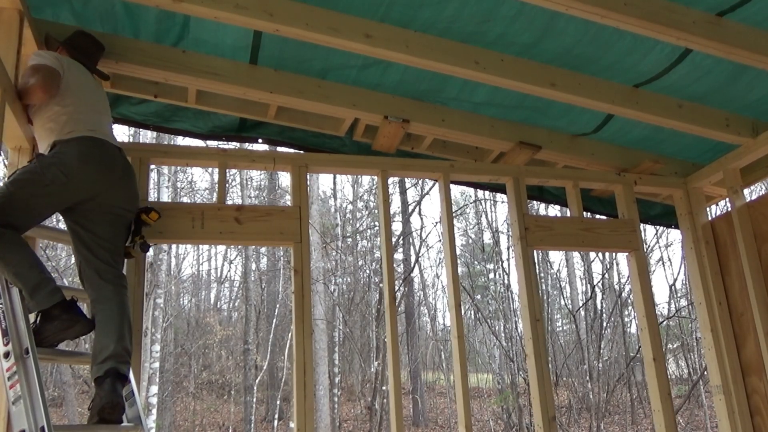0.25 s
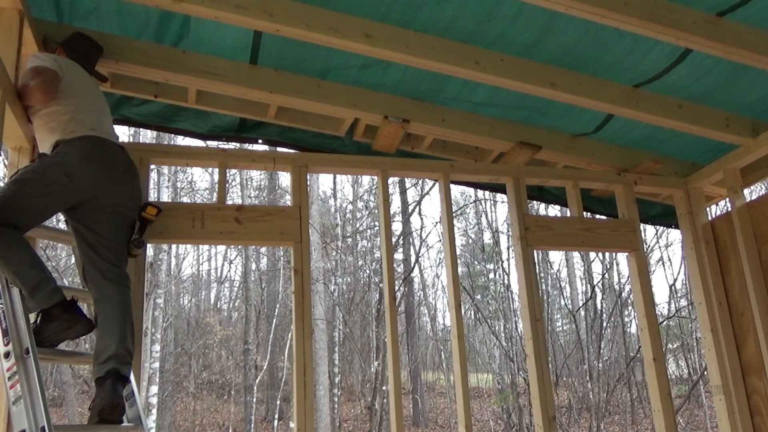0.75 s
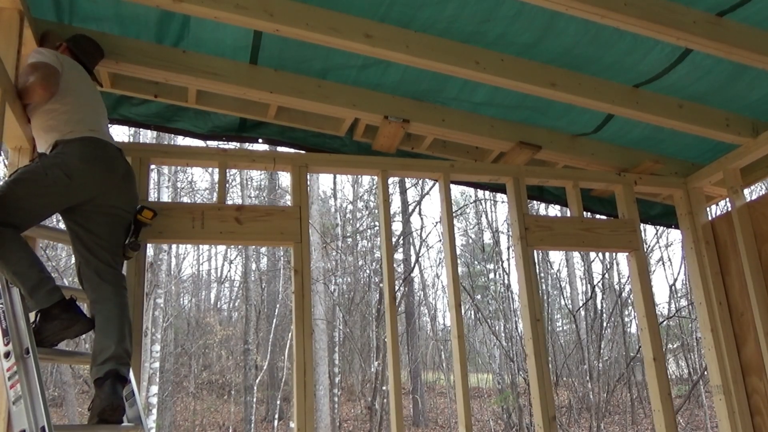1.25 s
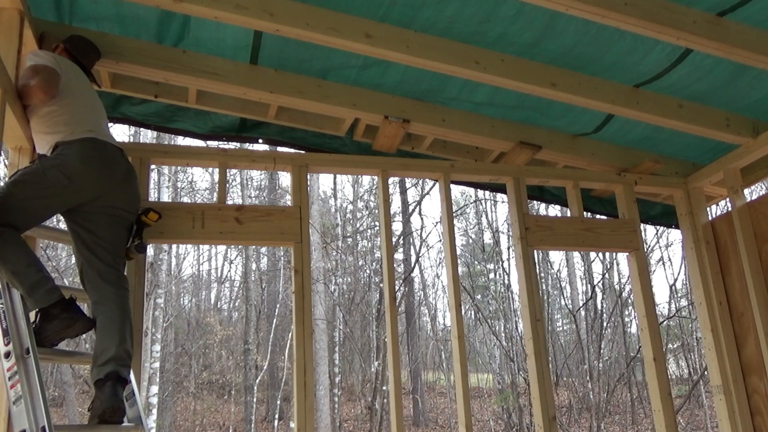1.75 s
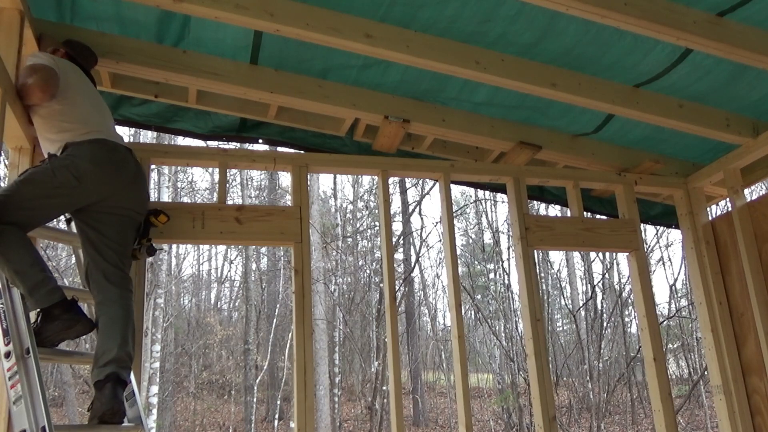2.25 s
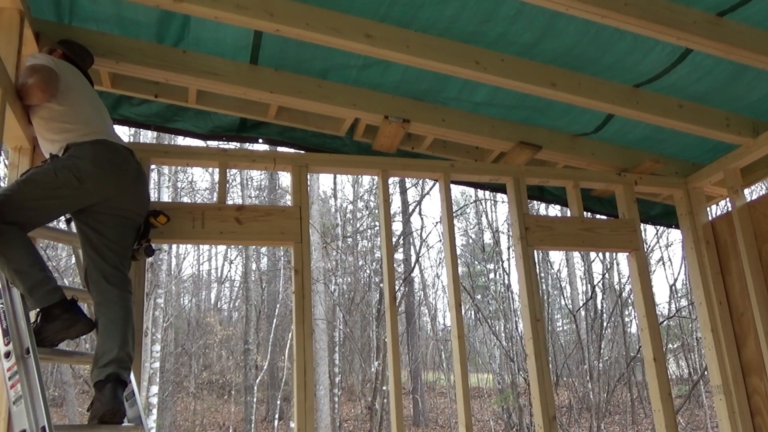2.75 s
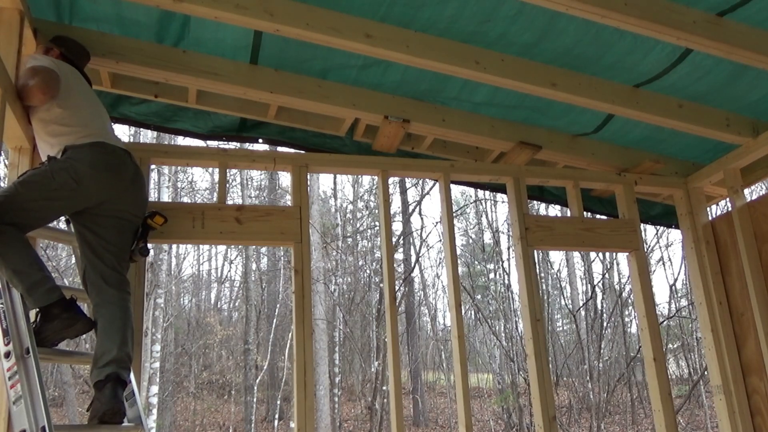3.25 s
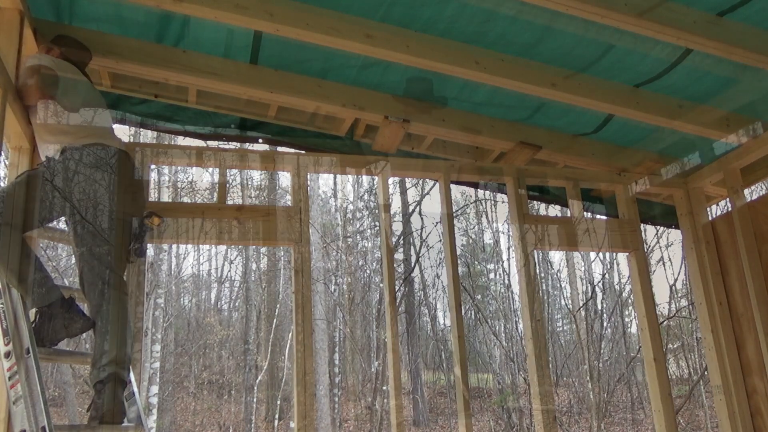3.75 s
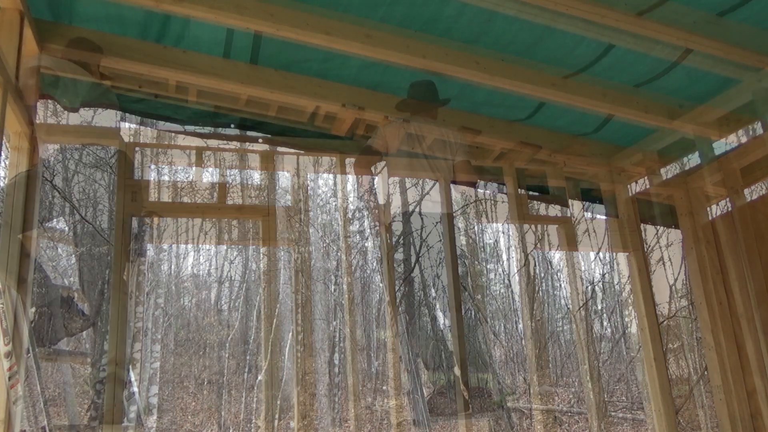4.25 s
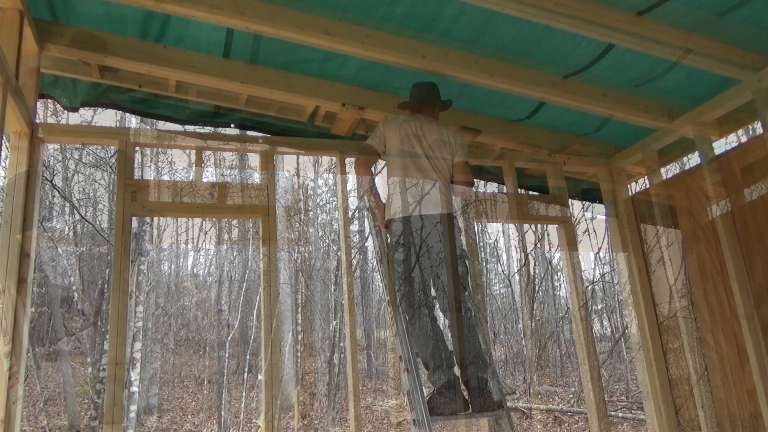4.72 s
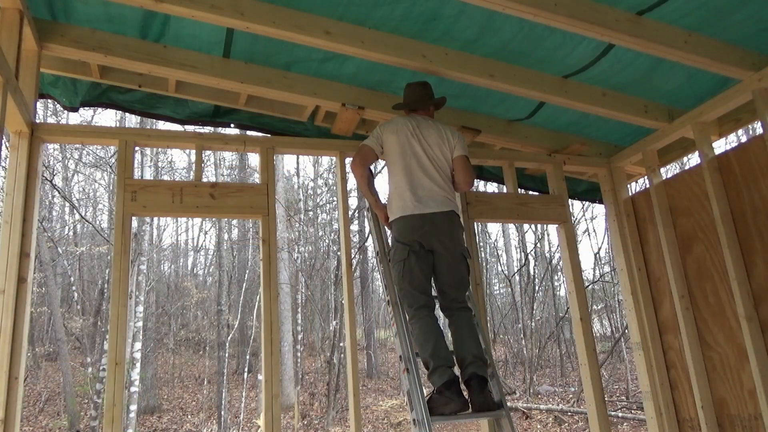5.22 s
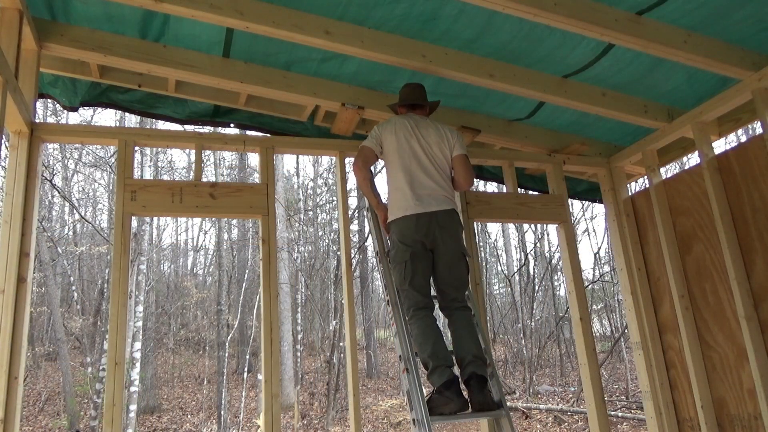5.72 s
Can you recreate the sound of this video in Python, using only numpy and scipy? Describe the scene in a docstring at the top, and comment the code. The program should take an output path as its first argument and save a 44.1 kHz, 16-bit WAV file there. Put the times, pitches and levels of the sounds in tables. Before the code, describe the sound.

Under a tarp roof in the woods, soft continuous rain makes a dense bed of tiny taps. Over it come abrupt bursts of wet sheet rustling, bright and crackling with low flaps, spaced about a second apart and fading in strength. Sharp little drips tick at random. The second half is calmer, lighter rain with a single brief distant chirp. Heard in modest stereo from below, with slight reverberation off the framing.

```python
"""Under open roof framing with a tarp stretched over it: steady rain patters on the sheet, as filtered
random grains and clicks, and sinks to a quieter level in the second half. Five times the wet sheet is
tugged and rustles in a short burst of coarse grains, noise snaps and low slaps. Single large drips tick
on it as short noise splashes, and a far bird, a gliding near sine, gives one thin high call. All but
the rain echoes in the framing; two microphone ports hear it in stereo."""
import sys
import numpy as np
from scipy import signal
from scipy.io import wavfile

SR = 44100
rng = np.random.default_rng(int(sys.argv[2]) if len(sys.argv) > 2 else 0)


def wav_record(signal):
    """Record a signal, one row per channel, as 16-bit PCM in the file named by sys.argv[1]."""
    frames = np.transpose(np.atleast_2d(signal))
    bounded = np.clip(frames, -1, 1)
    # unit amplitude maps onto the largest positive 16-bit level
    quanta = np.round(bounded * 32767).astype(np.int16)
    wavfile.write(sys.argv[1], SR, quanta)


N = 263718


def gain_of(db):
    """Amplitude factor of a level in dB."""
    return 10 ** (np.asarray(db) / 20)


def evened(x):
    """Scaled to an RMS of one."""
    return x / np.sqrt(np.mean(x ** 2) + 1e-20)


def read(points, hz):
    """Curve value at a frequency, interpolated along log frequency."""
    f, value = np.transpose(points)
    return np.interp(np.log(hz + 1), np.log(f + 1), value)


def add(mix, s, sound):
    """Lay a stereo sound into the mix at a time in seconds."""
    part = mix[:, round(s * SR):][:, :sound.shape[1]]
    part += sound[:, :part.shape[1]]


def coloured(x, points):
    """Causal minimum-phase filter with the given spectrum."""
    gain_db = read(points, abs(np.fft.fftfreq(8192, 1 / SR)))
    log_gain = np.log(gain_of(np.maximum(gain_db, -100)))
    spectrum = np.exp(np.conj(signal.hilbert(log_gain)))
    taps = np.fft.ifft(spectrum).real[:4096]
    return signal.oaconvolve(x, taps[None], axes=1)[:, :x.shape[1]]


# How wide the two microphone ports hear a sound: (frequency [Hz], side over mid [dB])
STEREO_WIDTH = [(60, -34), (130, -38), (230, -20.5), (400, -20.5), (800, -14), (1600, -10), (4000, -9.5),
                (8500, -9), (10000, -18.5), (11200, -42), (13000, -41)]


def stereo(pair, pan_db=0):
    """One row is heard by both microphone ports alike, the other as their difference; bass does not lean."""
    lean = np.tanh(pan_db * np.log(10) / 40) * pair[0]  # pan_db is left over right
    lean = signal.lfilter(*signal.butter(2, [500, 11000], "band", fs=SR), lean)
    side = coloured(pair[1:], STEREO_WIDTH)[0] + lean
    return np.array([pair[0] + side, pair[0] - side])


def random_sizes(shape, spread_db):
    """Random signs and exponentially spread sizes; a negative spread makes a few small instead of large."""
    size = gain_of(spread_db * np.minimum(rng.exponential(1, shape), 5))
    return size * rng.choice([-1., 1.], shape)


def grains(tilt_db, flap_db, per_cycle, spread_db, cycles):
    """Two rows of short random rings in a ladder of pitches; the high, short ones come more often."""
    out = np.zeros((2, len(tilt_db)))
    for hz in np.geomspace(30, 17000, 20):
        t = np.arange(0, 3 * cycles / hz, 1 / SR)
        ring = np.sin(2 * np.pi * hz * t) * t * np.exp(-2 * np.pi * t * hz / cycles)
        ring = ring[None] / np.linalg.norm(ring)
        hit = rng.random(out.shape) < min(per_cycle * hz / SR, 1)
        hits = evened(hit * random_sizes(out.shape, spread_db))
        weight = gain_of(tilt_db * np.log2(hz / 2500) + flap_db / (1 + (hz / 600) ** 4))
        rings = signal.oaconvolve(hits * weight, ring, axes=1)[:, :out.shape[1]]
        out += np.sqrt(hz / 5000) * rings  # equal power per Hz before the weight
    return out


def crackle(length, per_s, spread_db):
    """Two rows of bare one-sample clicks at random times and sizes."""
    hit = rng.random((2, length)) < per_s / SR
    return evened(hit * random_sizes(hit.shape, spread_db))


def drift(per_s):
    """Slow chance up to the given rate: sines of random phase, the slower ones stronger."""
    t = np.arange(N) / SR
    rates = np.geomspace(per_s / 10, per_s, 16)
    return evened(sum(np.sin(2 * np.pi * (f * t + rng.random())) / np.sqrt(f) for f in rates))


# Rain on the sheet, sinking halfway: (time [s], level [dB])
RAIN_LEVEL = [(0.0, -41.5), (0.4, -39.5), (0.8, -38), (1.06, -40.5), (2.05, -39), (2.5, -41), (3.05, -40),
              (3.46, -40.5), (4.01, -45.5), (4.78, -48), (5.61, -46.5), (5.98, -47.5)]
# Colour of the patter: (frequency [Hz], filter gain [dB])
PATTER_COLOUR = [(13, -73), (22, -50), (53, -44), (87, -20.5), (165, -20.5), (211, -14), (398, -7),
                 (482, -2), (1580, 0), (3230, -4), (7190, -11), (8970, -10), (14700, -28), (16000, -38)]
# Brightness at the loudest [dB per octave], and its change per dB of level: lighter rain is brighter
RAIN_TILT_DB, RAIN_TILT_PER_DB = .55, -.07
RAIN_PAN_DB = -1.25  # left over right


def rain():
    """Countless small drops ring on the sheet, the nearest as dry clicks; the level wavers a little."""
    t = np.arange(N) / SR
    level_db = np.interp(t, *np.transpose(RAIN_LEVEL))
    tilt_db = RAIN_TILT_DB + RAIN_TILT_PER_DB * (level_db - level_db.max())
    drops = evened(grains(tilt_db, 0, per_cycle=.45, spread_db=1.5, cycles=1.79))
    drops = drops + gain_of(-7) * crackle(N, per_s=3000., spread_db=1.0)
    level = gain_of(level_db + 0.56 * drift(25))
    return stereo(evened(coloured(drops, PATTER_COLOUR)) * level, RAIN_PAN_DB)


# Tugs of the sheet: (start [s], hardest pull [s], end [s], top level [dB], low flap [s])
SHEET_TUGS = [(.615, 0.686, 0.83, -20.5, 0.662), (1.639, 1.726, 1.83, -24.5, 1.745),
              (2.795, 2.879, 3.0, -24, 2.905), (3.38, 3.429, 3.52, -29, 3.44),
              (4.35, 4.404, 4.46, -33, 4.42)]
# Colour of the rustle: (frequency [Hz], filter gain [dB])
RUSTLE_COLOUR = [(15, -62), (25, -24), (130, -24.5), (200, -12), (394, -8.5), (476, -6.5), (591, -8.5),
                 (1840, -11.5), (2160, -12.5), (3080, -12.5), (9320, -19), (13200, -34.5), (16000, -71)]
# The crease runs across the roof: (share of the tug [0-1], left over right [dB])
CREASE_PAN = [(0, 2.5), (.5, 0.5), (1, -2)]
# Level at start and end against the top [dB], and the bend of each slope
RISE_DB, RISE_CURVE, FALL_DB, FALL_CURVE = -26, 2.28, -27.5, 1.57
# A harder pull is brighter: dB per octave at the top, and its change per dB of level
TILT_TOP_DB, TILT_PER_DB = 1.34, 0.2329
# Weight of the bass, below about 600 Hz: held back at rest, swelling round the flap for a spread in seconds
FLAP_REST_DB, FLAP_TOP_DB, FLAP_S = -12.5, -1, 0.027


def tug(start, top, end, top_db, flap):
    """Creases snap and water jumps off the sheet: coarse grains and clicks under the pull."""
    t = np.arange(start, end, 1 / SR)
    before = np.maximum(top - t, 0) / (top - start)
    after = np.maximum(t - top, 0) / (end - top)
    pull_db = RISE_DB * before ** RISE_CURVE + FALL_DB * after ** FALL_CURVE
    tilt_db = TILT_TOP_DB + TILT_PER_DB * pull_db
    flap_db = FLAP_REST_DB + (FLAP_TOP_DB - FLAP_REST_DB) * np.exp(-((t - flap) / FLAP_S) ** 2)
    creases = grains(tilt_db, flap_db, per_cycle=.25, spread_db=1.0, cycles=2.39)
    clicks = gain_of(-11.5 + tilt_db) * crackle(len(t), per_s=1400.0, spread_db=-1.5)
    rustle = evened(coloured(creases + clicks, RUSTLE_COLOUR))
    pan_db = np.interp(np.linspace(0, 1, len(t)), *np.transpose(CREASE_PAN))
    level = gain_of(top_db + pull_db) * signal.windows.tukey(len(t), .08)
    return start, stereo(rustle * level, pan_db)


def tick(s, strength_db, hz, t60, pan_db, rise, crack):
    """Noise in a band round the pitch: a crack and a splash that dies quickly."""
    t = np.arange(5000) / SR
    band = signal.butter(2, [hz / 1.71, min(hz * 1.34, .45 * SR)], "band", fs=SR)
    fade = crack * np.exp(-t / 0.00099) + gain_of(-60 * t / t60)
    splash = rng.standard_normal((2, len(t))) * fade * (1 - np.exp(-t / rise))
    splash = signal.lfilter(*band, splash)
    # the microphone softens the very top of each tick
    splash = signal.lfilter(*signal.butter(2, 14500, fs=SR), splash)
    return s, stereo(gain_of(strength_db) * np.sqrt(6000 / hz) * splash, pan_db)


# Big creases that snap during a tug: (time [s], strength before the pitch weighting [dB], pitch [Hz])
CREASE_SNAPS = [(0.631, -22, 4500), (0.645, -17, 3080), (0.664, -10, 4200), (0.683, -12, 3800),
                (0.692, -15.5, 1300), (0.703, -12, 1730), (0.729, -14, 2780), (0.753, -16, 2500),
                (0.768, -31, 2900), (1.672, -19.5, 1440), (1.707, -28, 3200), (1.729, -19, 1000),
                (2.834, -21, 1690), (2.852, -24, 3110), (2.889, -22, 950), (3.387, -25, 1310),
                (3.413, -22, 1600), (3.426, -23, 4500), (4.365, -33, 1950), (4.386, -27, 1180)]


def snap(s, strength_db, hz):
    """A crease snaps: a softer-edged tick with little crack."""
    return tick(s, strength_db, hz, t60=0.061, pan_db=1, rise=0.0016, crack=.2)


# The slack sheet slaps the rafters: (time [s], strength before the soft start [dB], pitch [Hz])
RAFTER_SLAPS = [(0.659, -22, 460), (0.719, -19, 496), (1.734, -18.5, 496), (2.833, -23, 735),
                (2.869, -23, 690), (2.899, -25, 720), (3.413, -23, 710), (3.444, -28.5, 514),
                (4.41, -21.5, 437), (4.434, -31, 490)]


def slap(s, strength_db, hz):
    """A dull damped ring with a soft start, alike at both ports."""
    t = np.arange(5000) / SR
    fade = gain_of(strength_db - 60 * t / 0.041)  # down 60 dB in 41 ms
    ring = np.sin(2 * np.pi * (hz * t + rng.random())) * fade * (1 - np.exp(-t / 0.0033))
    return s, np.array([ring, ring])


# Large drips: (time [s], strength before the pitch weighting [dB], pitch [Hz], 60 dB decay [s], left over right
# [dB]); the last two rows together make one broad drop
LARGE_DRIPS = [(0.388, -34.5, 8900, .06, 5), (0.442, -38, 8200, .06, .4), (1.255, -37, 5200, 0.073, 5),
               (1.46, -38, 1800, .08, .1), (2.055, -34, 3000, 0.15, .4), (2.1345, -33, 7500, .04, -1),
               (2.1753, -28.5, 6000, 0.071, 6), (2.184, -26, 5430, 0.07, -5), (2.634, -41, 8900, .06, 10),
               (2.76, -34, 4830, 0.067, -.4), (3.715, -43, 9000, 0.12, -5), (3.813, -40, 9200, 0.099, -2),
               (3.897, -32.5, 9700, 0.14, 3), (5.7697, -38, 13500, 0.03, -.4),
               (5.771, -39.5, 5000, 0.14, 2)]


def drip(s, strength_db, hz, t60, pan_db):
    """A large drop, or one part of a broad drop, hits the sheet: a sharp crack, then its splash."""
    return tick(s, strength_db, hz, t60, pan_db, rise=0.00033, crack=1.14)


BIRD_S, BIRD_LENGTH_S, BIRD_DB, BIRD_RISE_S, BIRD_FADE_DB = 4.983, .107, -55, .009, -12
BIRD_THROB_DB, BIRD_THROBS_PER_S = 2.5, 45
BIRD_HZ, BIRD_DROP_HZ, BIRD_DROP_S = 8100, 1350, .007  # held pitch, how far above it starts, time constant
BIRD_WARBLE_HZ, BIRD_WARBLES_PER_S = 150, 30


def bird():
    """A far, thin near sine that drops in pitch, then holds with a slight warble, throbbing as it fades."""
    t = np.arange(0, BIRD_LENGTH_S, 1 / SR)
    warble_hz = BIRD_WARBLE_HZ * np.cos(2 * np.pi * BIRD_WARBLES_PER_S * t)
    hz = BIRD_HZ + BIRD_DROP_HZ * np.exp(-t / BIRD_DROP_S) + warble_hz
    throb_db = BIRD_THROB_DB * np.cos(2 * np.pi * BIRD_THROBS_PER_S * (t - BIRD_RISE_S))
    level = gain_of(BIRD_DB + BIRD_FADE_DB * t / BIRD_LENGTH_S + throb_db)
    level = level * np.minimum(t / BIRD_RISE_S, 1) ** 2
    call = np.sqrt(2) * level * np.sin(2 * np.pi * np.cumsum(hz) / SR)
    call = call * signal.windows.tukey(len(t), .1)
    return BIRD_S, call * gain_of([[.5], [-.5]])  # 1 dB stronger on the left


# Echo among the studs: (frequency [Hz], 60 dB decay [s])
FRAMING_DECAY = [(200, 0.25), (1000, 0.3), (8000, 0.34)]


def framing(x):
    """Echo as sparse taps of random sign, each band dying at its own speed."""
    taps = np.zeros((2, SR // 2))
    jitter = rng.integers(0, 20, (2, (SR // 2 - 301) // 20))
    at = np.arange(300, SR // 2 - 20, 20) + jitter  # the first return comes after about 7 ms
    np.put_along_axis(taps, at, rng.choice([-1., 1.], at.shape), 1)
    hz, t, z = signal.stft(taps, SR, nperseg=256)
    fade = gain_of(-60 * t / read(FRAMING_DECAY, hz)[:, None])
    tail = signal.istft(z * fade, SR, nperseg=256)[1]
    tail = tail / np.linalg.norm(tail[0])
    return stereo(signal.fftconvolve(x.mean(0)[None], tail, axes=1)[:, :N])


def scene():
    """Tugs, snaps, slaps, drips and bird with their echo in the framing, plus the rain."""
    dry_events = np.zeros((2, N))
    for play, rows in [(tug, SHEET_TUGS), (snap, CREASE_SNAPS), (slap, RAFTER_SLAPS), (drip, LARGE_DRIPS)]:
        for row in rows:
            add(dry_events, *play(*row))
    add(dry_events, *bird())
    # the microphone takes in little deep bass from these sounds
    events = signal.sosfilt(signal.butter(2, 95, "high", fs=SR, output="sos"), dry_events)
    return events + gain_of(-9.5) * framing(events) + rain()


def record(dry):
    """The band limit: a steep low-pass at 16 kHz."""
    taps = signal.firwin(511, 16000, window=("kaiser", 9), fs=SR)
    return signal.oaconvolve(dry, taps[None], "same")


dry = scene()
out = record(dry)
wav_record(out)
```